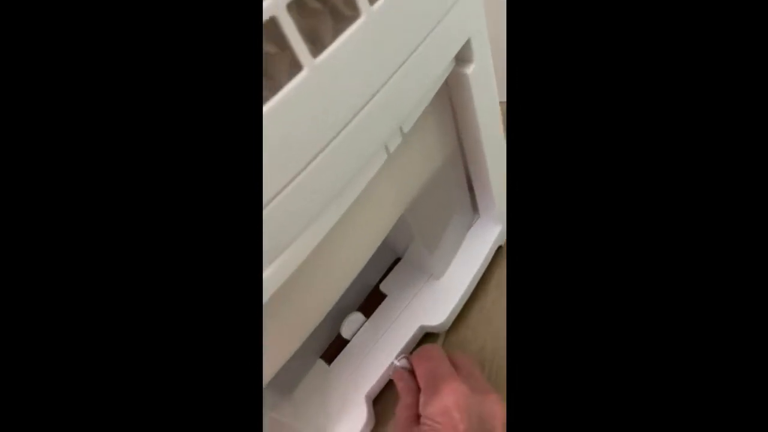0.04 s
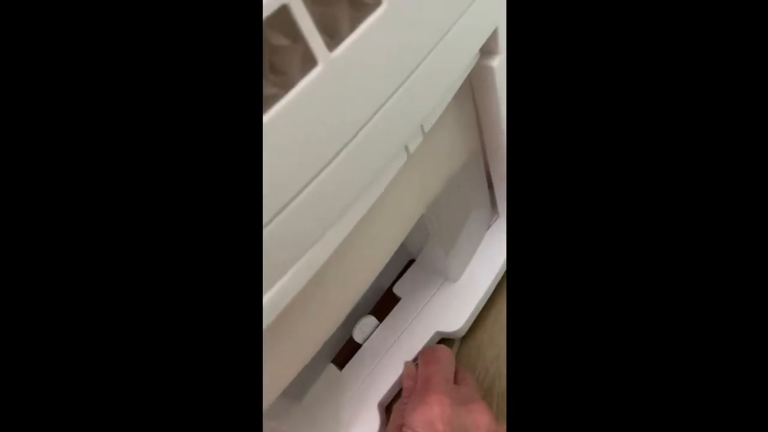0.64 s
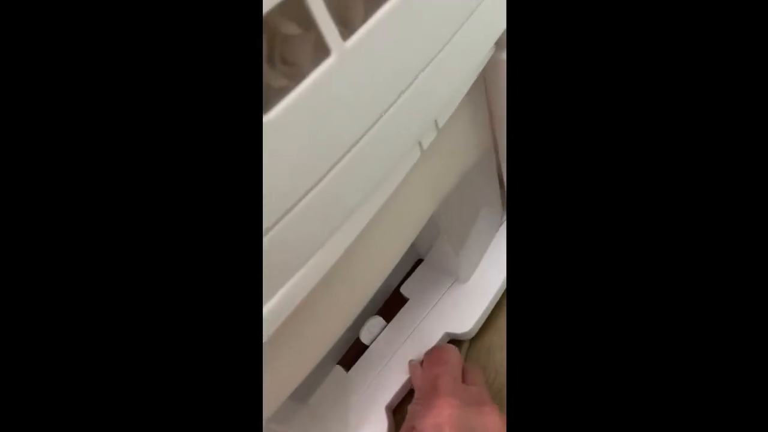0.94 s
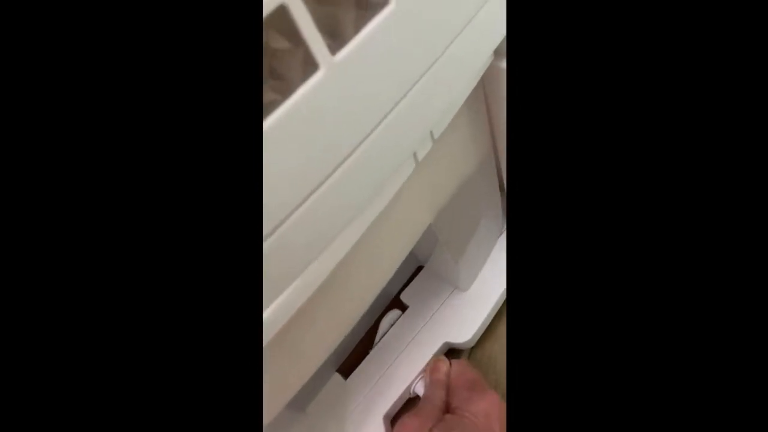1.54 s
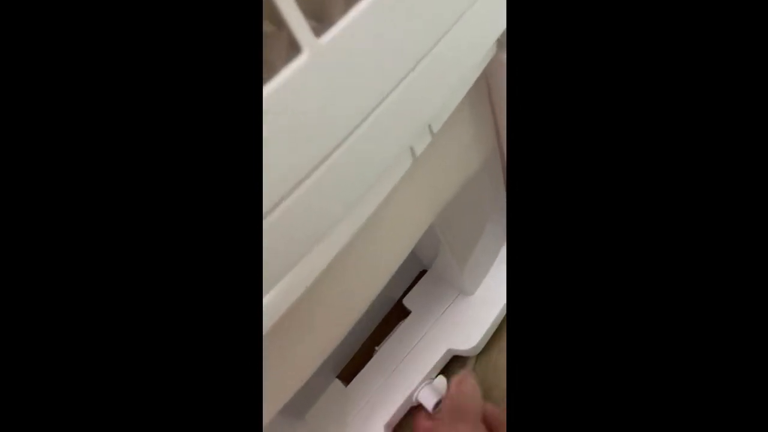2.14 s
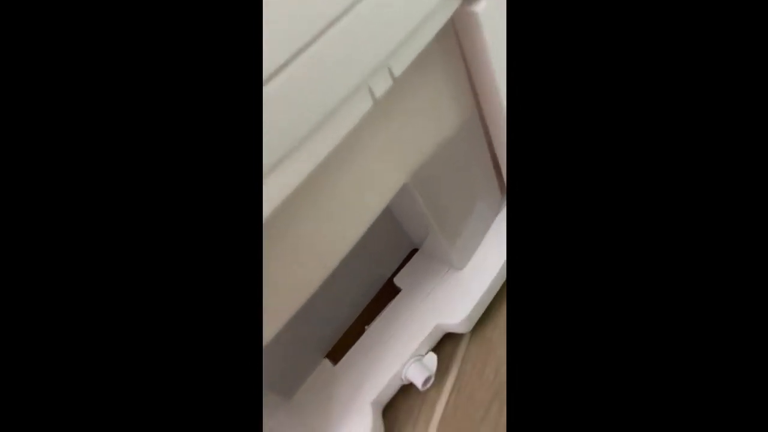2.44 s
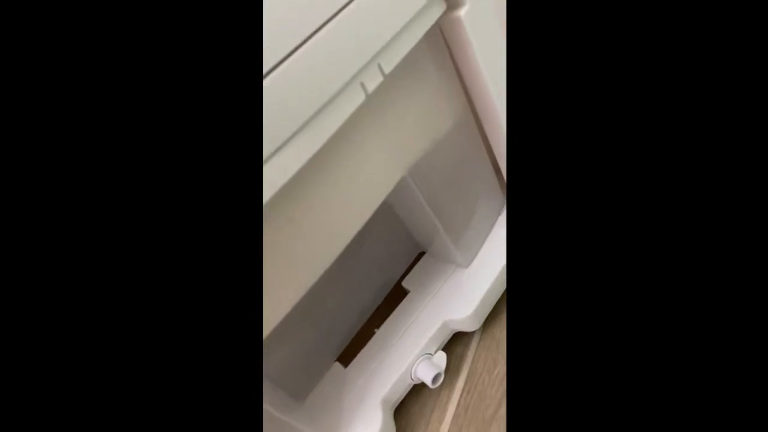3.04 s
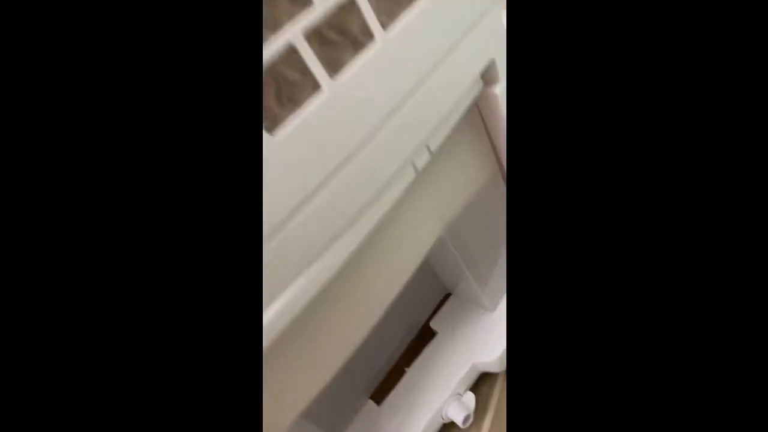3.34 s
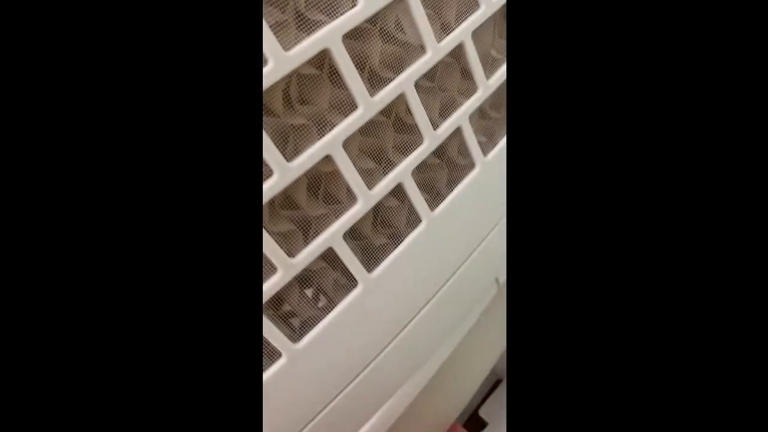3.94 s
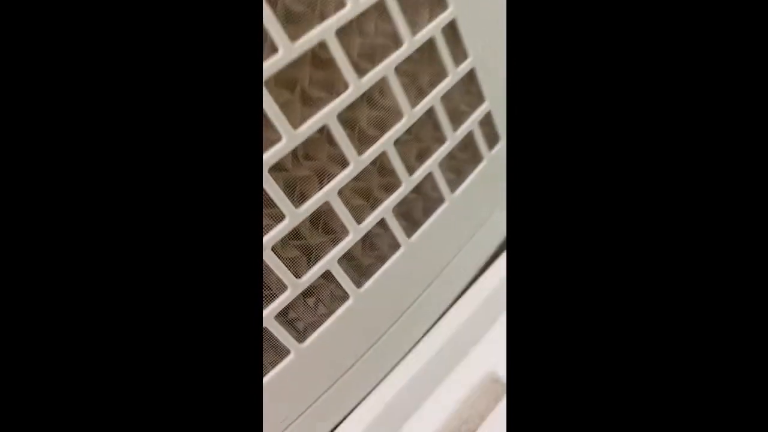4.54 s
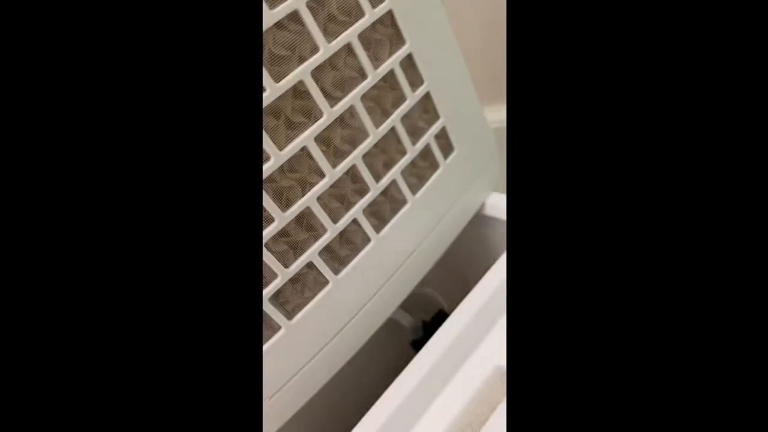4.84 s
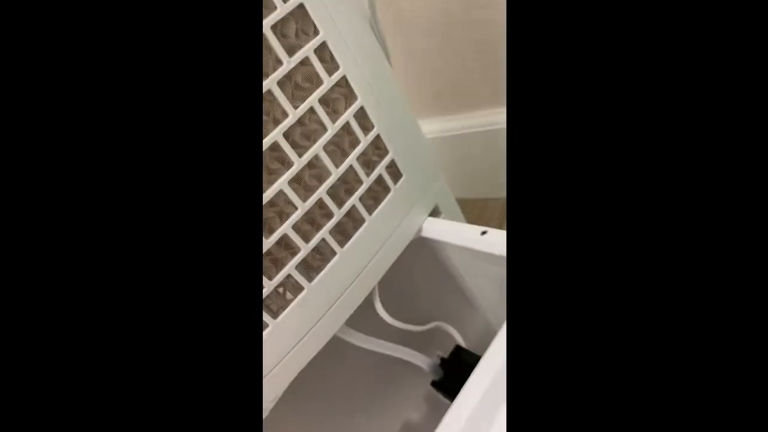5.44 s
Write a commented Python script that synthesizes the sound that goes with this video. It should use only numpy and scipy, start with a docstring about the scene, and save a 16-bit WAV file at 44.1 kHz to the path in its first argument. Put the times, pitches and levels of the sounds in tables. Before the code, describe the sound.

An air cooler hums while a plastic plug creaks and snaps, then its tray knocks, scrapes out and drops with a hollow clack.

```python
"""An air cooler hums close by in a small room while a hand twists the drain plug of its water tray.
The plug sticks and slips, creaking and snapping in the plastic wall; fingers brush the plastic, and a
faint whistling squeak is heard. The tray knocks against the cabinet, scrapes along its runners,
bumps over a stop, squeals where it binds and drops clear with a hollow clack. Each blow rings a
plastic panel; each scrape is a stream of tiny catches between two surfaces."""
import sys
import numpy as np
from scipy import signal
from scipy.fft import rfft, irfft, next_fast_len
from scipy.io import wavfile
from scipy.ndimage import uniform_filter1d

SR = 44100
rng = np.random.default_rng(int(sys.argv[2]) if len(sys.argv) > 2 else 0)


def transcribe(u):
    """Save the signal u as a 16-bit wav file named by the first command-line argument.

    u: samples, shape (n,) or (channels, n), limited to [-1, 1]; the rate is SR.
    q: integer samples, one column per channel.
    """
    v = np.clip(np.atleast_2d(u).T, -1, 1)
    q = np.round(v * 32767).astype(np.int16)
    wavfile.write(sys.argv[1], SR, q)


N = 251370

# modes of the cabinet and of the free tray: (pitch [Hz], level [dB], undamped t60 [s])
CABINET_MODES = [(84.7, -0.5, 0.093), (131.7, -6, 0.34), (163.6, -3, 0.055), (265.5, -4.5, 0.024),
                 (366, -0.5, 0.097), (520.4, 3, 0.024), (622.5, -6, 0.087), (1026, -6, 0.078),
                 (1444, -6.5, 0.0091), (1760, -24, .05), (2120, -26.5, 0.03), (2270, -19.5, 0.048),
                 (3280, -11.5, 0.0037)]
TRAY_MODES = [(100, 4.5, 0.016), (160, -7, 0.081), (369, 3, 0.034), (473, 17.5, 0.22), (594, -2, 0.13),
              (913, 6, 0.035), (990, 7, 0.037), (1461, -5.5, 0.053), (1840, -30, 0.054), (2540, -3, 0.029),
              (3430, -8, 0.012)]
# rasp of rubbed plastic: (frequency [Hz], level [dB])
RASP_SPECTRUM = [(1100, -20.5), (1600, 5.5), (1950, -1.5), (2500, -1), (3300, -8.5), (4100, -6.5),
                 (6000, -56.5)]


def amp(db):
    """Decibels to gain."""
    return 10 ** (np.asarray(db) / 20)


def unit(x):
    """Scales to rms 1."""
    return x / np.sqrt(np.mean(x ** 2) + 1e-20)


def curve_at(points, hz):
    """Reads a table on a log-frequency axis."""
    f, value = np.transpose(points)
    return np.interp(np.log(hz + 1), np.log(f + 1), value)


def shaped(x, points):
    """Equalises x with a curve of (frequency [Hz], gain [dB])."""
    size = next_fast_len(len(x) + 2048)
    gain = amp(curve_at(points, np.fft.rfftfreq(size, 1 / SR)))
    return irfft(rfft(x, size) * gain, size)[:len(x)]


def add(mix, s, sound):
    """Adds a sound at time s."""
    part = mix[round(s * SR):][:len(sound)]
    part += sound[:len(part)]


def swell(s, db, fade=0.027):
    """Gain that follows a level curve and fades out beyond its ends."""
    t = np.arange(N) / SR
    gate = np.interp(t, [s[0] - fade, s[0], s[-1], s[-1] + fade], [0, 1, 1, 0])
    return amp(np.interp(t, s, db)) * gate


def drift(span_s):
    """A random wander of rms 1 that turns about once in span_s."""
    knots = np.arange(0, N / SR + span_s, span_s)
    return unit(np.interp(np.arange(N) / SR, knots, rng.standard_normal(len(knots))))


def tremble(samples):
    """A quick random flutter of rms 1: noise smoothed over a few samples."""
    return unit(uniform_filter1d(rng.standard_normal(N), size=samples))


def resonate(x, hz, width_hz):
    """A resonance that follows the pitch curve hz."""
    turn = np.exp(2j * np.pi * np.cumsum(hz) / SR)
    pole = np.exp(-np.pi * width_hz / SR)
    return 2 * (turn * signal.lfilter([1 - pole], [1, -pole], x / turn)).real


def dying_noise(t60s, size):
    """Noise whose bands each die at their own speed."""
    hz, t, bands = signal.stft(rng.standard_normal(size), SR, nperseg=128)
    decay = amp(-60 * t / curve_at(t60s, hz)[:, None])
    return signal.istft(bands * decay, SR)[1][:size]


def cooler(hum_db=-4.0, air_db=-54.0, waver=0.26):
    """The motor hums on a few gently wavering lines over the low rush of the air it stirs."""
    # motor lines and air spectrum: (frequency [Hz], level [dB])
    hum_lines = [(59.2, -51.5), (118.4, -52.5), (177.6, -65.5), (242.2, -63), (414.5, -71)]
    air_spectrum = [(20, -34.5), (40, -23.5), (62, 0), (88, -2), (125, -12.5), (160, -11.5), (240, -20),
                    (330, -25.5), (420, -30.5), (520, -35), (800, -46.5), (2000, -54.5), (7500, -57.5),
                    (10000, -60.5), (16000, -69)]
    t = np.arange(N) / SR
    knots = np.linspace(0, t[-1], num=24)
    hum = np.zeros(N)
    for hz, db in hum_lines:
        tone = unit(np.sin(2 * np.pi * (hz * t + rng.random())))
        hum += amp(db) * tone * (1 + waver * np.interp(t, knots, rng.standard_normal(len(knots))))
    air = unit(shaped(rng.standard_normal(N), air_spectrum))
    return amp(hum_db) * hum + amp(air_db) * air


def slip(modes, direct_s=.004, echo_s=.007, echo_db=-4, size=4096):
    """One slip crosses the wall as a falling chirp, echoes once from its edge and rings briefly."""
    # a soft push with little treble: (frequency [Hz], gain [dB])
    softness = [(2000, 1), (2600, -11.5), (3000, -7), (3600, -15), (7000, -8), (14000, -11.5)]
    hz = np.fft.rfftfreq(size, 1 / SR) + 1
    wall = sum((-1) ** k * amp(db) / (1 + 1j * (hz - f * f / hz) / width)
               for k, (f, width, db) in enumerate(modes))
    bending = -4j * np.pi * np.sqrt(1000 * hz)  # the travel times hold at 1 kHz
    paths = np.exp(bending * direct_s) + amp(echo_db) * np.exp(bending * echo_s)
    fade = np.clip(np.linspace(3, -1, size), 0, 1)
    wave = shaped(irfft(wall * paths), softness) * fade
    return wave / np.linalg.norm(wave) * np.sqrt(SR / 100)  # the energy of 10 ms at rms 1


def creak(jitter=.025, wander=.012, uneven_db=2, build_db=2, arch_db=5, max_slips=32):
    """The plug sticks and slips, in single ticks or, during a twist, in a quick and nearly even train."""
    # single slips: (time [s], level [dB], brightness [dB])
    slips = [(0.6, -40, -9), (0.9384, -40.5, -20), (0.9664, -42, -11), (1.1524, -44.5, -2),
             (1.1701, -43.5, -5), (1.2555, -39.5, -1.5), (1.8569, -46, -4), (1.887, -45, 3.5),
             (1.9021, -36.5, -2), (1.922, -31, 3.5), (1.948, -34, 2), (2.0478, -51, 11)]
    # twists: (time [s], length [s], slip rate [1/s], level [dB], brightness [dB])
    twists = [(0.064, 0.054, 134, -70, 1), (0.129, 0.052, 92, -64, -40), (0.175, 0.099, 121, -59.5, -43),
              (0.28, 0.095, 102, -57.5, -0.5), (0.365, 0.047, 195, -51.5, -37),
              (0.4198, 0.048, 148, -50, -17), (0.5072, 0.028, 74, -48.5, -9.5),
              (0.618, 0.032, 103, -52, 2.5), (0.653, 0.044, 134, -61.5, 5), (0.704, 0.09, 128, -68, -3.5),
              (0.8024, 0.1, 72, -52.5, -17.5), (0.873, 0.063, 84, -45, -14),
              (0.982, 0.034, 76, -40.5, -6.5), (1.322, 0.019, 91, -56.5, -10), (1.3698, 0.042, 100, -52, 4),
              (1.965, 0.05, 73, -38.5, -3)]
    # the hand-damped wall's ring and its slow flexing: (pitch [Hz], width [Hz], level [dB])
    damped_modes = [(89.6, 52, 6), (466, 110, 4), (667, 280, 1), (934, 120, -13.5), (1290, 163, -8.5),
                    (1774, 200, -25), (2000, 220, -11), (2300, 310, -20.5), (2894, 200, -18.5),
                    (4370, 360, -26.5)]
    flex_modes = [(180, 34, 0)]
    body, flex = slip(damped_modes), slip(flex_modes)
    n = np.arange(len(body))

    def tick(db, bright, scatter_db=-5, scatter_s=.006, flex_db=-33.5, flex_share=0.46):
        """Each slip scatters at random among the wall's ribs; a stronger one flexes the wall more."""
        ribs = rng.standard_normal(len(n)) * np.exp(-n / SR / scatter_s)
        scattered = signal.fftconvolve(body, ribs / np.linalg.norm(ribs))[:len(n)]
        wave = shaped(body + amp(scatter_db) * scattered, [(700, 0.0056), (2000, bright)])
        return amp(db) * wave + amp(flex_share * db + flex_db) * flex

    out = np.zeros(N)
    for s, db, bright in slips:
        add(out, s, tick(db, bright))
    for start, length, rate, db, bright in twists:
        timing, strengths, detune = rng.standard_normal((max_slips, 3)).T
        delays = np.cumsum([0, *np.exp(jitter * timing) / rate])
        sound = tick(db, bright)
        for delay, strength, pitch in zip(delays[delays < length], strengths, np.exp(wander * detune)):
            # a twist swells toward its middle and grows as the hand bears down
            arch = np.sin(np.pi * (delay + .5 / rate) / (length + .5 / rate)) - 2 / np.pi
            gain = amp(build_db * (delay / length - .5) + arch_db * arch + uneven_db * strength)
            add(out, start + delay, gain * np.interp(n * pitch, n, sound))
    return out


def grains(per_s, spread_db):
    """Tiny catches of two rubbing surfaces, random in time and size."""
    sizes = amp(spread_db * np.minimum(rng.exponential(1, N), 4)) * rng.choice([-1, 1], N)
    return sizes * (rng.random(N) < per_s / SR)


def brushes(attack_s=0.0052, fade_db=-8):
    """Skin brushes the plastic: puffs of fine grit that start quickly and fade."""
    # finger strokes: (time [s], length [s], hiss level [dB], rasp relative to hiss [dB])
    strokes = [(0.255, 0.29, -73, -17), (0.644, 0.11, -65, -6), (0.96, 0.12, -69.5, -6),
               (1.135, 0.26, -71, -21), (1.915, 0.31, -68.5, -18), (2.931, 0.038, -88.5, 10),
               (3.009, 0.042, -89.5, 5), (3.293, 0.085, -67, -24), (3.753, 0.016, -56, -6),
               (3.891, 0.062, -65, -1), (5.558, 0.072, -41.5, -31)]
    # hiss of skin on plastic: (frequency [Hz], level [dB])
    skin_spectrum = [(2800, -5.5), (4500, -2), (6500, 3.5), (8000, 1.5), (10500, -5), (13000, -1),
                     (15500, -6.5)]
    grit = grains(6900, spread_db=3.0)
    hiss, rasp = unit(shaped(grit, skin_spectrum)), unit(shaped(grit, RASP_SPECTRUM))
    out = np.zeros(N)
    for s, length, db, bite in strokes:
        envelope = swell([s + attack_s, s + length], [db, db + fade_db], fade=attack_s)
        out += envelope * (hiss + amp(bite) * rasp)
    return out


def ring(modes, ring_scale, fine_db, size=8192, spot_db=5.0, rise_s=0.0013):
    """A struck plastic panel: a few strong modes, weighted by where it is hit, over many fine ones."""
    # the fine modes: (frequency [Hz], level [dB]) and (frequency [Hz], undamped t60 [s])
    fine_spectrum = [(40, -27.5), (100, -5.5), (400, -1.5), (1000, -7), (2500, -16), (4500, -18),
                     (8000, -19), (12000, -26), (16000, -29)]
    fine_decay = [(100, 0.072), (500, 0.17), (1500, 0.047), (4000, 0.046), (14000, 0.054)]
    t = np.arange(size) / SR
    hz, db, t60 = np.transpose(modes)[:, :, None]
    db = db + spot_db * rng.standard_normal(db.shape)
    sign = (-1) ** np.arange(len(hz))[:, None]
    envelopes = amp(db - 60 * t / (t60 * ring_scale)) / np.sqrt(t60)
    strong = (sign * envelopes * np.sin(2 * np.pi * hz * t)).sum(0)
    fine = shaped(dying_noise([(f, s * ring_scale) for f, s in fine_decay], size), fine_spectrum)
    return (unit(strong) + amp(fine_db) * unit(fine)) * np.minimum(t / rise_s, 1)


def registers(x, lag_s, centres_hz, focus, sharpness=2.8):
    """Splits a ring into thump, body, clack and tick, each of energy 1."""
    # borders between the four registers: (frequency [Hz])
    crossovers = [300, 1000, 3000]
    hz = np.fft.rfftfreq(len(x), 1 / SR)
    x = signal.sosfilt(signal.butter(2, 48, "high", fs=SR, output="sos"), x)
    # bending waves bring the bass late; lag_s holds at 1 kHz
    spectrum = rfft(x) * np.exp(-4j * np.pi * lag_s * np.sqrt(1000 * hz))
    lowpasses = [0 * hz] + [1 / (1 + (hz / edge) ** 6) for edge in crossovers] + [1 + 0 * hz]
    parts = spectrum * np.diff(lowpasses, axis=0)
    # the place of the blow decides at which pitch each register, from the thump upward, rings most
    for part, centre in zip(parts, centres_hz):
        part *= 1 + focus / (1 + 1j * sharpness * (hz / centre - centre / (hz + 1)))
    fade = np.clip(np.linspace(3, -1, len(x)), 0, 1)
    parts = irfft(parts) * fade
    return parts / np.linalg.norm(parts, axis=1, keepdims=True)


def blows(rows, modes, ring_scale, fine_db, lag_s, register_db, focus=0.85, lead_s=.001, hardness=0.3):
    """Each blow rings the panel; a harder contact has more tick and wakes more of the fine modes."""
    out = np.zeros(N)
    for s, db, thump, body, tick, *centres_hz in rows:
        gains = amp(db + np.array([thump, body, 0, tick]) + register_db)
        panel = ring(modes, ring_scale, fine_db + hardness * tick)
        add(out, s - lead_s, gains @ registers(panel, lag_s, centres_hz, focus))
    return out


def snaps(pivot_db=-41.5, thinning=0.35, thump_trade=0.94):
    """The plug jumps in its hole and rings the wall."""
    # jumps of the plug: (time [s], level [dB], thump offset [dB], tick offset [dB],
    # thump pitch [Hz], body pitch [Hz], clack pitch [Hz])
    jumps = [(1.0245, -23.5, 2.5, 0, 130, 660, 2000), (1.23, -47.5, -3.5, 5.5, 134.2, 660, 1900),
             (1.5166, -30, -6.5, -0.5, 90, 710, 2170), (1.694, -22, -1.5, -3.5, 150.7, 440, 1450)]
    # the wall round the plug: (pitch [Hz], level [dB], undamped t60 [s])
    wall_modes = [(83, 1.5, 0.16), (139, -5, 0.16), (216.4, -9.5, 0.17), (328.7, -3, 0.041),
                  (421, 4, 0.074), (636, 5, 0.077), (753.4, 1, 0.15), (943, 1.5, 0.17), (1185, 1.5, 0.053),
                  (1840, -5, 0.051), (2375, -3.5, 0.014), (2960, -13, 0.0046)]
    rows = []
    for s, db, thump, tick, *centres_hz in jumps:
        # a stronger snap is less hollow, and what goes into the thump is lost to the body
        body = thinning * (pivot_db - db) - thump_trade * thump
        rows.append((s, db, thump, body, tick, *centres_hz))
    return blows(rows, wall_modes, ring_scale=0.55, fine_db=-0.5, lag_s=0.00277,
                 register_db=[27.6, 26.3, 22.26, 24.38], focus=1.9)


def knocks():
    """The tray knocks against the cabinet and chatters over its stop."""
    # hits on the cabinet: (time [s], level [dB], thump offset [dB], body offset [dB],
    # tick offset [dB], thump pitch [Hz], body pitch [Hz])
    hits = [(2.364, -69.5, -12, 11.5, -33, 203, 614), (2.414, -54, -20, -16, -20, 197, 898),
            (3.054, -84.5, -8, -12, -2, 200, 900), (3.366, -57, -40.5, -25, -12, 92, 930),
            (3.5061, -35.5, 14.5, 3, -6, 221, 395), (3.521, -52.5, 31.5, 1, -6, 172, 350),
            (3.5314, -38, 7.5, 9.5, -0.5, 262, 393), (3.564, -40.5, 15, 2, -1.5, 228, 600),
            (3.5693, -42, 6, 2.5, -3, 225, 850), (3.607, -46.5, 2, -14, -7, 140, 397),
            (3.7768, -53, 18.5, 8, -6, 204, 357), (3.9072, -53.5, 21.5, 6, -1, 193, 367),
            (3.9241, -46, 18.5, 8.5, -14, 99, 374), (3.9655, -60.5, 29, 5, -19, 127, 373),
            (4.018, -61.5, 35.5, -3, 2, 111, 374), (4.04, -40, 2, 11.5, -28, 202, 362),
            (4.069, -35.5, 16, -7, -26, 88.5, 373), (4.2593, -40.5, 8, 6, -21, 196, 370),
            (4.267, -53.5, 31, 12, -13, 120, 370), (4.6018, -17.5, 1, -18, -15.5, 290, 850),
            (4.606, -15, -4, 4.5, -10, 275, 422), (4.6147, -18, 2, -1, -14, 245.5, 340),
            (4.626, -24.5, 14, -5, -4, 107, 326), (4.637, -25, -9, 4, -31, 163, 463),
            (4.644, -30.5, 8, 9, -3, 99, 530), (4.872, -42, -17, -5, -17, 112, 500),
            (4.906, -37.5, 10, -8, -19, 180, 414), (5.069, -38.5, 0, 5.5, -33, 112, 430),
            (5.0889, -36, 4, -10, -8, 205, 387), (5.112, -43, 12, -4, -12, 180, 433),
            (5.158, -44.5, 2, 11, -4, 199, 315), (5.3306, -33, 9, 6.5, -23, 164, 466),
            (5.457, -45, 17, 15.5, -21, 262, 414)]
    # the gripping hand damps the ring: (time [s], share of the undamped ring time [ratio])
    hand_damping = [(3.6, 0.77), (3.77, 0.93)]
    out = np.zeros(N)
    for hit in hits:
        ring_scale = np.interp(hit[0], *np.transpose(hand_damping))
        out += blows([hit], CABINET_MODES, ring_scale, fine_db=3.5, lag_s=0.002536,
                     register_db=[23.36, 21.6, 22.63, 22.0], focus=2.9)
    return out


def squeak(start_s=2.39, rise_s=.06, fall_s=.13, hz=3920, width_hz=130, peak_db=-68, ends_db=-14.0):
    """A faint, thin, raspy whistling squeak near 4 kHz with a weak upper partial."""
    noise, pitch = rng.standard_normal(N), np.full(N, hz)
    lower = unit(resonate(noise, pitch, width_hz))
    upper = unit(resonate(noise, 1.84 * pitch, width_hz))
    envelope = swell(start_s + np.cumsum([0, rise_s, fall_s]), peak_db + np.array([ends_db, 0, ends_db]))
    return envelope * unit(lower + amp(-9) * upper)


def runners(grit, shift=.05, swell_db=3, change_s=.03, width_hz=220, dry_gain=.6):
    """Grit rings the runners; as the contact moves along, each resonance shifts and swells on its own."""
    # resonances of the runners: (pitch [Hz], level [dB])
    resonances = [(1500, -20), (1930, 9), (2650, 0.5), (3310, -1.5), (4030, -9.5)]
    rings = np.zeros(N)
    for hz, db in resonances:
        gain = amp(db + swell_db * drift(change_s))
        pitch = hz * np.exp(shift * drift(change_s))
        rings += gain * unit(resonate(grit, pitch, width_hz))
    return unit(unit(rings) + dry_gain * unit(grit))


def slide(scrape_db=-2.5, rumble_db=-4.5, rasp_db=-2.5, hiss_db=-10.5, catch_db=2.0, jolt_db=-10.5):
    """The tray scrapes on its runners, catching and letting go, while its hollow body rumbles and jolts."""
    # four pulls, each a curve of (time [s], scrape level [dB], rumble level [dB], rasp level [dB])
    pulls = [
        [(4.01, -56, -46, -63), (4.026, -61, -35.5, -70), (4.056, -37, -27, -40), (4.136, -44, -38.5, -51),
         (4.158, -54, -39, -71), (4.245, -48, -46, -59)],
        [(4.267, -47, -35, -63), (4.281, -40.5, -25.5, -45.5), (4.339, -40.5, -55, -45),
         (4.39, -43.5, -42.5, -40.5), (4.445, -44.5, -38, -35), (4.475, -42, -39.5, -37.5),
         (4.53, -45.5, -35, -51), (4.571, -59, -48, -62), (4.597, -33, -20, -38)],
        [(4.76, -50, -41, -58), (4.868, -51, -44, -62.5), (4.924, -46, -36.5, -47), (4.954, -46, -43, -45.5),
         (5.002, -52, -39.5, -41.5), (5.048, -47.5, -31.5, -46), (5.086, -59, -28.5, -47),
         (5.218, -51.5, -32.5, -61.5), (5.31, -55, -76, -61)],
        [(5.51, -57, -40.5, -59.5), (5.556, -47, -37, -41.5), (5.572, -66, -37.5, -61), (5.588, -36, -26, -36)],
    ]
    # colours of the sliding layers: (frequency [Hz], level [dB])
    scrape_spectrum = [(250, -6), (550, 6), (750, 7.5), (900, 13), (1100, 12), (1450, 2), (1800, -14.5),
                       (2600, -44)]
    rumble_spectrum = [(30, -27), (60, 11), (90, 10.5), (160, 10), (280, 2.5), (400, 6), (550, -8),
                       (900, -35.5)]
    hiss_spectrum = [(2800, -10), (4500, 1), (6000, 5), (8000, 1.5), (11500, -54), (13000, -4.5),
                     (15500, -12.5)]
    grip = amp(catch_db * tremble(samples=350))
    grit = unit(grains(4000, spread_db=1.2) * grip)
    scrape = unit(shaped(grit, scrape_spectrum))
    rasp = runners(shaped(grit, RASP_SPECTRUM))
    rumble = unit(shaped(grains(1100, spread_db=-0.5), rumble_spectrum))
    hiss = unit(shaped(grit + rng.standard_normal(N), hiss_spectrum))
    bumps = grains(160, spread_db=-4.0)
    jolts = unit(signal.oaconvolve(bumps, ring(CABINET_MODES, ring_scale=0.67, fine_db=3.5))[:N])
    out = np.zeros(N)
    for pull in pulls:
        s, mid, low, bite = np.transpose(pull)
        out += swell(s, mid) * (amp(scrape_db) * scrape + amp(jolt_db) * jolts)
        out += swell(s, low + rumble_db) * rumble
        out += swell(s, bite) * (amp(rasp_db) * rasp + amp(hiss_db) * hiss)
    return out


def squeal(upper_ratio=1.7, upper_db=-15.0):
    """Plastic binds on plastic in the runner: a short rough squeal on two partials."""
    # path of the squeal: (time [s], pitch [Hz], level [dB])
    glide = [(4.959, 2015, -60), (4.979, 2300, -50), (4.999, 2257, -41), (5.016, 2035, -38.5),
             (5.03, 2200, -40), (5.042, 2300, -68)]
    s, hz, db = np.transpose(glide)
    pitch = np.interp(np.arange(N) / SR, s, hz) * (1 + .04 * tremble(samples=30))
    phase = 2 * np.pi * np.cumsum(pitch) / SR
    tone = np.sin(phase) + amp(upper_db) * np.sin(upper_ratio * phase)
    flutter = abs(tremble(samples=160))
    return swell(s, db) * unit(flutter * tone)


def clacks(body_offset_db=-2, thump_hz=123):
    """The tray drops clear and rings on its own."""
    # hits of the falling tray: (time [s], level [dB], thump offset [dB], tick offset [dB])
    hits = [(5.5481, -34, -22, -6), (5.5924, -22, -9, -9.5), (5.6083, -28.5, 12, -23),
            (5.616, -7.5, -1.5, -17), (5.6925, -25, -27, -10)]
    rows = [(s, db, thump, body_offset_db, tick, thump_hz) for s, db, thump, tick in hits]
    return blows(rows, TRAY_MODES, ring_scale=0.61, fine_db=-7, lag_s=0.0012,
                 register_db=[23.5, 23.0, 21.9, 21.1])


def drag():
    """The loose tray judders over the edge, which keeps its modes ringing."""
    # swell of the judder: (time [s], level [dB])
    levels = [(5.58, -51), (5.61, -32), (5.65, -31.5), (5.7, -27.5)]
    catches = grains(900, spread_db=5.0)
    judder = signal.oaconvolve(catches, ring(TRAY_MODES, ring_scale=0.18, fine_db=-10.5))[:N]
    return swell(*np.transpose(levels)) * unit(judder)


def room(sides, wet_db, build_s=0.0038, tails=3):
    """An object's first side heard directly, plus the tails its sides raise in a small hard room."""
    # the room's tail: (frequency [Hz], t60 [s]) and (frequency [Hz], gain [dB])
    decay = [(100, 0.77), (400, 0.41), (1500, 0.55), (5000, 0.53), (14000, 0.4)]
    colour = [(60, 2), (200, 7), (600, 5), (3000, 0), (7000, -0.5), (14000, -11.5)]
    t = np.arange(N) / SR
    wet = np.zeros(N)
    for k in range(tails):
        tail = dying_noise(decay, size=SR // 2) * np.minimum(t[:SR // 2] / build_s, 1)
        # the tails crossfade, so the pattern of reflections changes as when things move
        share = np.cos(2 * np.pi * t + np.pi * k / tails) * np.sqrt(2 / tails)
        wet += signal.oaconvolve(sides[k % len(sides)] * share, tail / np.linalg.norm(tail))[:N]
    return sides[0] + amp(wet_db) * shaped(wet, colour)


def stereo(x, delay_ms=0.051, smear_s=0.0067):
    """A short diffuse side signal widens the sound between left and right; the right lags slightly."""
    # stereo width: (frequency [Hz], side level [dB])
    spread = [(60, -53.5), (180, -30.5), (300, -10.5), (450, -10), (700, -5), (1300, -10), (3500, -2.5),
              (6500, -16), (10000, -25), (15000, -13.5)]
    # stereo tilt: (frequency [Hz], left minus right [dB])
    balance = [(60, 0), (200, 0), (500, -0.2), (1000, -1.2), (2000, 1), (4000, -1.5), (15000, 2)]
    t = np.arange(SR // 10) / SR
    smear = rng.standard_normal(len(t)) * t * np.exp(-t / smear_s)
    side = shaped(signal.oaconvolve(x, smear / np.linalg.norm(smear))[:N], spread)
    left = shaped(x + side, [(hz, db / 2) for hz, db in balance])
    right = shaped(x - side, [(hz, -db / 2) for hz, db in balance])
    delay = np.sinc(np.arange(-32, 33) - delay_ms * SR / 1000) * np.hanning(65)
    return np.array([left, np.convolve(right, delay, "same")])


def scene(sides=5):
    """Plug, squeak and tray in the room, over the hum; a snapped panel rings differently to each side."""
    plug = room([snaps() for _ in range(sides)], wet_db=-15.0, tails=sides)
    plug += room([creak()], wet_db=-16.5)
    whistle = room([squeak()], wet_db=-21)
    tray = room([knocks() + slide() + brushes() + squeal() + drag()], wet_db=-14.5)
    tray += room([clacks()], wet_db=-19.5)
    return stereo(plug + whistle + tray + cooler())


def record(dry, ceiling=.9, cutoff_hz=16200):
    """Rounds off the loudest peaks, then trims the highest treble."""
    rounded = dry / (1 + (dry / ceiling) ** 6) ** (1 / 6)
    lowpass = signal.firwin(255, cutoff_hz, window=("kaiser", 9), fs=SR)
    return signal.oaconvolve(rounded, lowpass[None], "same")


dry = scene()
out = record(dry)
transcribe(out)
```